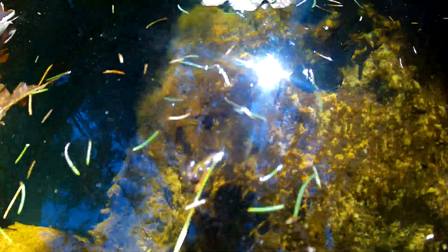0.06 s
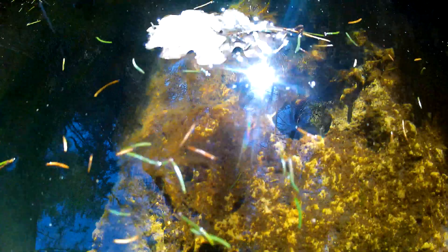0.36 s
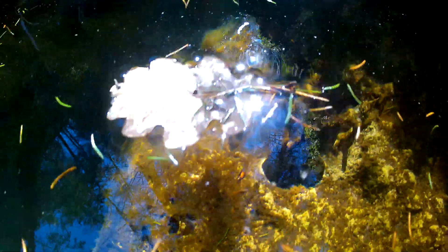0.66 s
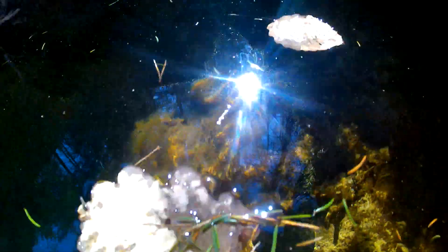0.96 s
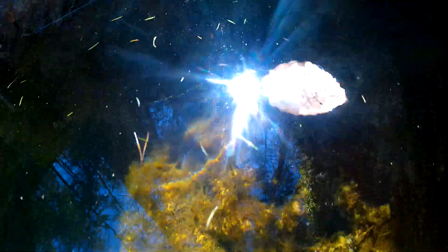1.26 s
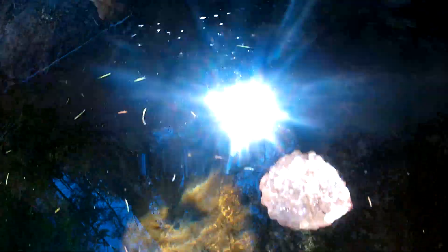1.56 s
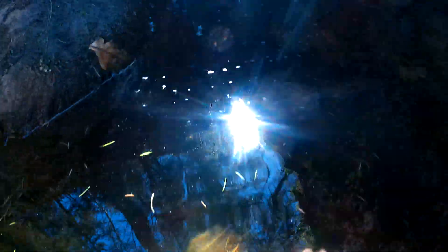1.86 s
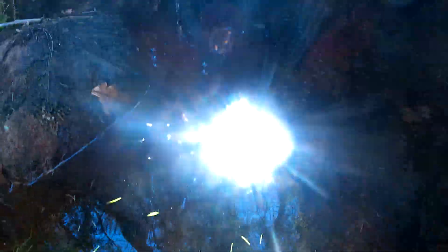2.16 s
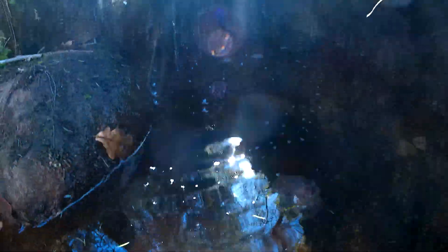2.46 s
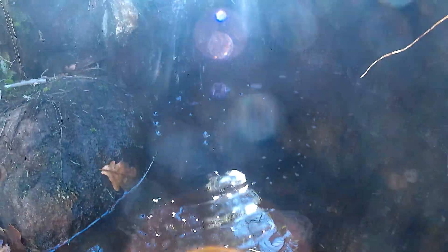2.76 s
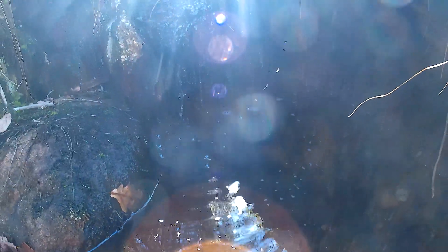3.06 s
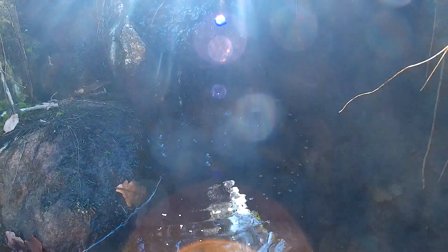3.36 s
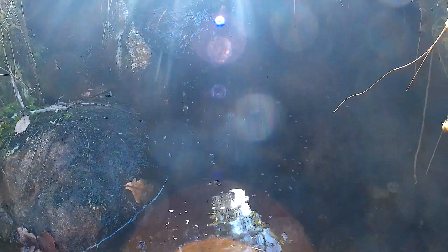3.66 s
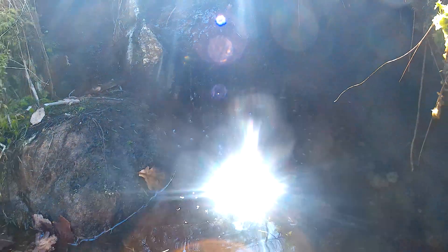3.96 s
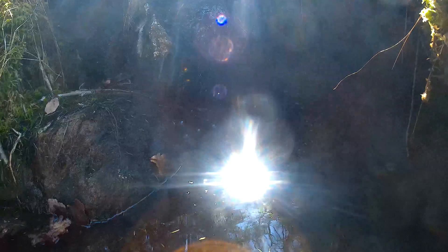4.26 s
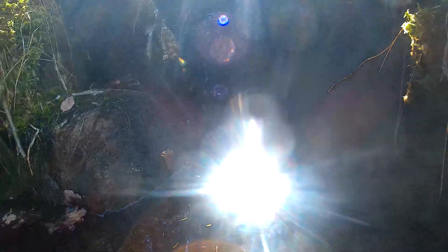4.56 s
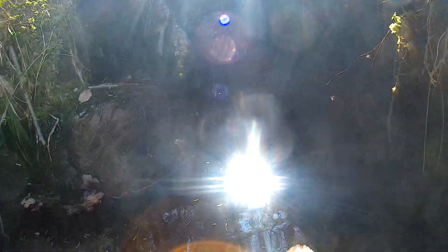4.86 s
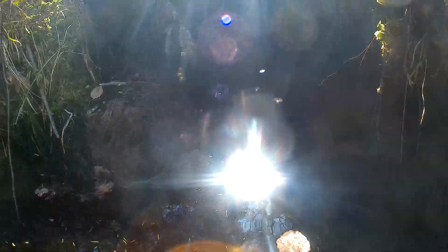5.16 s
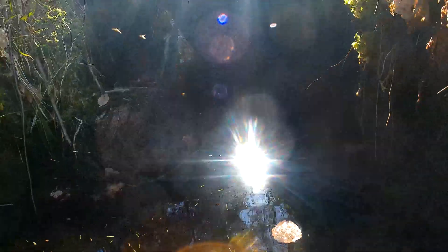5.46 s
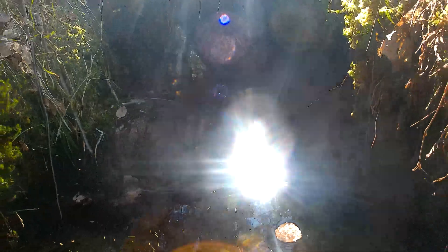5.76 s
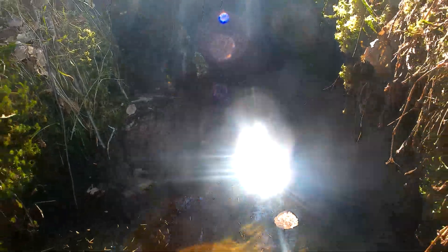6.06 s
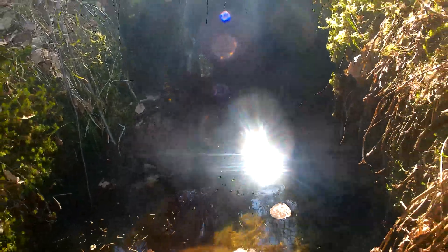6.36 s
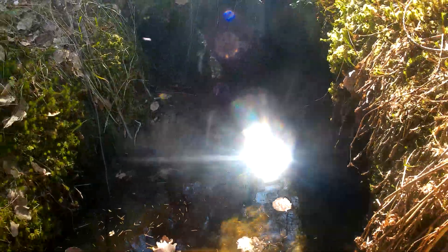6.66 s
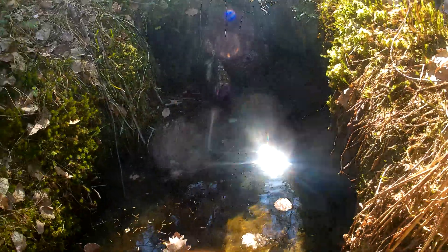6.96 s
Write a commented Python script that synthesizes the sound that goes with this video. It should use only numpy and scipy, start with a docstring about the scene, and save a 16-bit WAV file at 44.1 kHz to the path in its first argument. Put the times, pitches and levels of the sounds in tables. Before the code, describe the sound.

A small forest brook trickles over stones close to the microphone for about seven seconds, with almost no echo. From the start, many tiny bubbles babble together while larger ones gurgle and plop irregularly, several a second, often bending upward in pitch. Fine spray ticks lightly on top. The babble is liveliest in the first two and a half seconds, with more spray around 1 and 2.4 seconds. Clearer plops stand out at about 1.5 seconds and between 2.7 and 3.2 seconds. The flow softens near 3.5 seconds, picks up with a cluster of small drips around 4.6 seconds, then runs more gently from about 5.4 seconds to the end. Underneath throughout are a soft wash of distant water, a low rumble and a very faint high electronic whine. A barely audible, very high hiss flickers about once a second.

```python
"""In a forest, a small brook trickles over stones, close to a pocket camera.
Trapped air bubbles ring and rise in pitch as they near the surface; countless small ones babble
between them, spray ticks, and the stones and mossy banks throw it all back.
Under it lie the wash of water further off, a low rumble and the camera's faint whine.
A faint, very high hiss flickers on about once a second."""
import sys
import numpy as np
from scipy import signal
from scipy.fft import rfft, irfft
from scipy.io import wavfile
from scipy.ndimage import uniform_filter1d

SR = 44100
rng = np.random.default_rng(int(sys.argv[2]) if len(sys.argv) > 2 else 0)


def wav_out(sig):
    """Save sig, one row per channel (or a flat mono array), as 16-bit PCM at SR to the path in sys.argv[1]."""
    wavfile.write(sys.argv[1], SR, np.round(np.clip(np.atleast_2d(sig).T, -1, 1) * 32767).astype(np.int16))


N = 318402
TIME = np.arange(N) / SR


def undb(db):
    """Decibels to gain."""
    return 10 ** (np.asarray(db) / 20)


def level(x, db):
    """Set a sound to an rms level."""
    return x * undb(db) / np.sqrt(np.mean(x ** 2))


def automation(table, column):
    """Ramp through one column of a table whose rows start with a time in seconds."""
    rows = np.array(table)
    return np.interp(TIME, rows[:, 0], rows[:, column])


def equalise(x, points, size=8192):
    """Minimum-phase EQ through (Hz, dB) points, built by folding the cepstrum."""
    hz, db = np.transpose(points)
    bin_hz = np.arange(size // 2 + 1) * SR / size
    gain = undb(np.interp(np.log(bin_hz + 1), np.log(hz), db))
    cepstrum = irfft(np.log(gain))
    cepstrum[1:size // 2] *= 2
    cepstrum[size // 2 + 1:] = 0
    impulse = irfft(np.exp(rfft(cepstrum)))
    return signal.fftconvolve(x, impulse)[:N]


def drift(rate_hz):
    """A random modulator with an rms of 1: sample and hold, smoothed twice."""
    hold = max(int(SR / rate_hz), 1)
    steps = rng.standard_normal(N)[np.arange(N) // hold]
    return level(uniform_filter1d(uniform_filter1d(steps, hold), hold), 0)


def add(out, start_s, sound):
    """Mix a sound in at a time."""
    start = int(np.clip(start_s * SR, 0, len(out)))
    out[start:start + len(sound)] += sound[:len(out) - start]


def high_flicker(level_db=-66, period_s=1.025, first_s=.78, length_s=.075):
    """A faint, very high hiss flickers on about once a second."""
    band = signal.butter(4, [11800, 15000], "band", fs=SR, output="sos")
    hiss = signal.sosfilt(band, rng.standard_normal(N))
    gate = (TIME - first_s) % period_s < length_s
    return level(hiss, level_db) * gate


# The camera's whine. Each row: time in seconds, pitch in Hz, level of the fundamental in dB.
CAMERA_WHINE = [(0, 4645, -72.5), (2.6, 4680, -69), (3.05, 4812, -67), (7.2, 4650, -67.5)]

def camera(frame_hz=30, duty=.75, harmonic_db=-6.0, wander=0.015, buzz_db=-59):
    """The electronics whine for part of each frame and buzz at the frame rate."""
    frame, frame_phase = np.divmod(TIME * frame_hz, 1)
    pitch = automation(CAMERA_WHINE, 1) * (1 + wander * (drift(550) + drift(40) / 2))
    phase = 2 * np.pi * np.cumsum(pitch) / SR
    gate = uniform_filter1d(1. * (frame_phase < duty), size=100) * undb(2.15 * drift(20))
    whine = sum(level(gate * np.sin((k + 1) * phase), k * harmonic_db) for k in range(3))
    whine *= undb(automation(CAMERA_WHINE, 2))
    ticks = np.diff(frame, prepend=0)
    buzz = signal.sosfilt(signal.butter(2, [70, 220], "band", fs=SR, output="sos"), ticks)
    return whine + level(buzz, buzz_db)


# The tone of the distant stream and the air. Each row: frequency in Hz, relative gain in dB.
WASH_EQ = [(25, -2.5), (110, -6.5), (260, -11), (430, -11), (800, -19.5), (1500, -22), (2600, -30),
           (4600, -34), (7000, -35.5), (15500, -39)]

def wash(level_db=-51):
    """The bed: a smooth hiss of water further off, over a low rumble of air."""
    return level(equalise(rng.standard_normal(N), WASH_EQ), level_db)


def banks(x, tail_db=-16, t60_s=0.091, build_s=0.011, notch_hz=855, notch_q=12):
    """Mossy banks add a short diffuse tail; reflections among the stones cancel one narrow pitch."""
    t = np.arange(SR // 4) / SR
    impulse = rng.standard_normal(len(t)) * undb(-60 * t / t60_s) * (1 - np.exp(-t / build_s))
    impulse *= undb(tail_db) / np.linalg.norm(impulse)
    impulse[0] = 1  # the direct sound
    with_tail = signal.fftconvolve(x, impulse)[:N]
    return signal.lfilter(*signal.iirnotch(notch_hz, notch_q, fs=SR), with_tail)


# The resonant gaps between the stones. Each row: pitch in Hz, Q, gain of the added ring in dB.
STONE_GAPS = [(775, 46, 2.5), (1099, 47, -7.5)]

def stones(x):
    """The gaps between the stones ring on when a bubble passes through their pitch."""
    rings = (undb(db) * signal.lfilter(*signal.iirpeak(hz, q, fs=SR), x) for hz, q, db in STONE_GAPS)
    return x + sum(rings)


def droplet(hz, ring_db, slap_db, decay_s=0.0066, q=4.3):
    """A drop slaps the surface with a burst of hiss, which rings the tiny cavity that it makes."""
    t = np.arange(SR // 25) / SR
    slap = rng.standard_normal(len(t)) * np.exp(-t / decay_s) * -np.expm1(-t / decay_s * 5)
    cavity = signal.iirpeak(min(hz, SR / 3), q, fs=SR)
    ring = signal.lfilter(*cavity, signal.lfilter(*cavity, slap))
    return level(ring, ring_db) + level(slap, slap_db)


def bubble(hz, rise, life_s, quiver_depth=0.046, scoop_depth=0.47, scoop_cycles=1.08, attack_cycles=.62):
    """A pocket of air pinches off, rings, glides towards rise times its pitch and bursts."""
    t = np.arange(int(2 * life_s * SR) + 2) / SR
    age, cycles = t / life_s, t * hz
    freedom = np.clip(rise - 1, 0, 1)  # only a rising bubble scoops and swells at the surface
    # Its shape quivers, shaking the pitch about once every three cycles.
    quiver = quiver_depth * np.interp(0.339 * cycles, np.arange(64), rng.standard_normal(64))
    scoop = freedom * scoop_depth * np.exp(-cycles / scoop_cycles)  # starts flat at the pinch-off
    glide = 1 + (rise - 1) * np.tanh(.75 * age ** 2.505)  # lingers, then sweeps
    pitch = hz * glide * (1 + quiver - scoop)
    ring = np.sin(2 * np.pi * (np.cumsum(pitch) / SR + rng.random()))
    attack = -np.expm1(-cycles / attack_cycles)
    decay = np.exp(-2 * age ** 1.59)
    surface_swell = 0.6 * freedom * np.exp(-((age - 1) / 0.34) ** 2)
    burst_cutoff = np.exp(-(age / 1.23) ** 8)
    return ring * attack * (decay + surface_swell) * burst_cutoff


def fizz(low_hz=4200, high_hz=11000, life_s=0.0093, soft_db=-65, range_db=15, count=130):
    """The tiniest bubbles burst one by one, all along the brook."""
    out = np.zeros(N)
    for when, pitch, force in rng.random((count, 3)):
        ping = bubble(low_hz * (high_hz / low_hz) ** pitch, 1, life_s)
        add(out, when * N / SR, undb(soft_db + range_db * force ** 2) * ping)
    return out


# How lively the water is. Each row: time in seconds, babble level in dB, spray level in dB.
FLOW_LEVELS = [(0, -45.5, -64), (1, -43.5, -57), (1.7, -45.5, -68.5), (2.4, -45.5, -59.5), (3.5, -51, -66),
               (4.6, -46.5, -68.5), (5.4, -50.5, -67), (7.2, -51.5, -69.5)]
# The tone of falling drops. Each row: frequency in Hz, gain in dB.
SPRAY_EQ = [(900, -13), (2300, -1), (5200, 1.5), (7000, -8), (10500, -7.5), (15000, -22)]

def spray(centre_hz=3200, spread=0.375, slap_db=-3, scatter_db=3.0, flurry_db=2.5, count=560):
    """Fine drops fall back in flurries of soft, short pings."""
    out = np.zeros(N)
    for when, (pitch, force) in zip(rng.random(count), np.clip(rng.standard_normal((count, 2)), -2, 2)):
        ring_db = scatter_db * force
        add(out, when * N / SR, droplet(centre_hz * np.exp(spread * pitch), ring_db, ring_db + slap_db))
    flurries = undb(flurry_db * drift(rate_hz=18))
    return level(equalise(out, SPRAY_EQ) * flurries, 0) * undb(automation(FLOW_LEVELS, 2))


# The nearest drops, with levels before EQ.
# Each row: start in seconds, ring level in dB, ring pitch in Hz, slap level in dB.
CLOSE_DROPS = [(0.104, -61, 5900, -50.5), (0.7486, -49, 2420, -53), (0.8966, -48.5, 2170, -53),
               (0.935, -62, 7500, -52), (1.4332, -46, 2390, -45.5), (1.63, -54, 2360, -57),
               (2.066, -58.5, 2760, -49.5), (2.2098, -60, 2760, -52), (2.3027, -48, 2120, -65),
               (2.395, -60, 4730, -52), (2.5276, -44.5, 4100, -58), (2.55, -52.5, 6630, -48.5),
               (2.7505, -56, 2340, -51.5), (2.9615, -62, 4260, -52.5), (3.0917, -55, 5800, -50.5),
               (3.1742, -65, 4680, -51), (3.6682, -57.5, 4700, -49), (3.7547, -49.5, 2240, -59),
               (4.563, -46, 2300, -51.5), (4.609, -46.5, 2280, -66), (4.638, -54, 2800, -50),
               (4.7194, -55, 3550, -48), (4.7548, -53, 2960, -50), (4.933, -55.5, 2870, -60),
               (5.5242, -47.5, 1880, -56), (6.098, -50.5, 2200, -50)]

def splashes():
    """Larger drops hit the water close by, each with a slap and a ring."""
    out = np.zeros(N)
    for start_s, ring_db, hz, slap_db in CLOSE_DROPS:
        add(out, start_s, droplet(hz, ring_db, slap_db))
    return equalise(out, SPRAY_EQ)


# The tone of the hollow between the stones. Each row: frequency in Hz, relative gain in dB.
HOLLOW_EQ = [(350, 3.5), (750, 1), (1100, -1), (1420, 4.5), (1580, -5.5), (1750, -1), (2400, -6),
             (4000, -27), (10000, -26)]

def babble(centre_hz=1400, spread=0.2418, cycles=13, scatter_db=2.0, bend=0.059, lag_s=.007, spills=420):
    """Each spill traps three little bubbles that jostle, bend up or down, and ring in the hollow."""
    out = np.zeros(N)
    for when, cluster in zip(rng.random(spills), np.clip(rng.standard_normal((spills, 3, 5)), -2, 2)):
        for force, pitch, sustain, lag, lift in cluster:
            hz = centre_hz * np.exp(spread * pitch)
            rise = np.exp(bend * (lift + .5))
            life_s = cycles * np.exp(.5 * sustain) / hz
            add(out, when * N / SR + lag_s * lag, undb(scatter_db * force) * bubble(hz, rise, life_s))
    jostle = undb(1.5 * drift(400))
    return level(equalise(out * jostle, HOLLOW_EQ), 0) * undb(automation(FLOW_LEVELS, 1))


# The big, clear bubbles up front. Each row: start in seconds, pitch before the climb in Hz,
# life in seconds, climb (0 held under a stone, 1 rising freely, more if swept up), gain in dB.
BIG_BUBBLES = [(0.15, 1035, 0.016, 0.48, -24.5), (0.355, 788, 0.05, 0.38, -34.5),
               (0.423, 694, 0.029, 0.2, -25.5), (0.448, 642, 0.045, 0.19, -35),
               (0.605, 1100, 0.01, 1.42, -28.5), (0.68, 627, 0.019, 0.73, -22.5),
               (0.775, 1102, 0.011, 1.1, -24), (0.881, 1030, 0.0061, 1, -28),
               (0.936, 1384, 0.026, 0.25, -26), (1.209, 1190, 0.015, 0.52, -33.5),
               (1.212, 756, 0.026, 0.25, -35.5), (1.29, 1260, 0.045, 0.43, -33.5),
               (1.413, 1172, 0.021, 0.97, -28), (1.503, 1256, 0.018, 0.54, -23),
               (1.522, 1110, 0.007, 0.3, -14.5), (1.68, 527, 0.047, 0.25, -27.5),
               (1.724, 533, 0.055, 0.65, -31.5), (1.924, 587, 0.033, 0.72, -30.5),
               (1.963, 1267, 0.022, 0.024, -32), (2.01, 1210, 0.0078, 0.74, -27.5),
               (2.068, 1307, 0.021, 0.088, -30.5), (2.189, 1020, 0.042, 0.88, -33.5),
               (2.233, 843, 0.023, 1.46, -23), (2.288, 1020, 0.009, 0.14, -27),
               (2.503, 1376, 0.014, 0.67, -24), (2.53, 1160, 0.011, 1.64, -26),
               (2.55, 768, 0.098, 0.05, -42.5), (2.603, 1310, 0.016, 1.24, -29),
               (2.747, 1480, 0.0094, 0, -20), (2.786, 612, 0.027, 0.66, -21.5),
               (2.935, 1366, 0.016, 0.65, -28.5), (2.962, 1444, 0.021, 0.36, -28),
               (3.005, 1162, 0.014, 0.25, -17.5), (3.047, 1660, 0.0092, 0.33, -26),
               (3.114, 780, 0.03, 0, -38.5), (3.177, 1120, 0.013, 0.79, -20.5),
               (3.213, 1280, 0.012, 1.27, -27.5), (3.351, 1170, 0.031, 0.38, -31.5),
               (3.388, 980, 0.011, 0, -32), (3.52, 1415, 0.013, 0.91, -26), (3.686, 710, 0.045, 0.39, -27),
               (3.742, 1144, 0.017, 0.86, -28.5), (3.806, 749, 0.06, 0.82, -33),
               (3.912, 1160, 0.03, 0.74, -36), (4.09, 1026, 0.015, 0.12, -23),
               (4.138, 599, 0.046, 0.22, -31), (4.212, 1004, 0.022, 0.79, -27),
               (4.386, 1020, 0.021, 0.87, -25.5), (4.563, 946, 0.041, 0.072, -25.5),
               (4.66, 827, 0.053, 1.15, -28), (4.868, 970, 0.017, 0.14, -26.5),
               (5.194, 1237, 0.028, 0.37, -30.5), (5.443, 645, 0.026, 0.26, -36),
               (5.679, 669, 0.04, 0.15, -31), (5.819, 1410, 0.0086, 0.46, -29),
               (6.204, 774, 0.032, 0.082, -36), (6.377, 725, 0.06, 0.4, -35.5),
               (6.464, 955, 0.036, 0.0, -25.5), (6.636, 960, 0.014, 0.7, -31),
               (6.681, 857, 0.031, 1.34, -36.5), (6.718, 1017, 0.02, 0.93, -33.5),
               (6.738, 1127, 0.015, 0.45, -27.5), (6.782, 1025, 0.041, 0, -35),
               (6.971, 656, 0.062, 0.4, -36)]

def gurgles(octave_hz=782, shard_db=-11.5, shard_hz=1450, shard_life_s=0.0038, froth_db=-20.5):
    """Big bubbles wobble as they ring and tear a little froth; at the surface each breaks into three."""
    big, shards = np.zeros(N), np.zeros(N)
    for start_s, hz, life_s, climb, db in BIG_BUBBLES:
        # A free bubble at octave_hz heads an octave up; bigger, lower ones climb further.
        rise = 1 + climb * (octave_hz / hz) ** 1.48
        add(big, start_s, undb(db) * bubble(hz, rise, life_s))
        for when, pitch, sustain in rng.random((3, 3)):
            shard = bubble(shard_hz * 2 ** (pitch - .5), 1.05, shard_life_s * (.5 + sustain))
            add(shards, start_s + life_s * (.5 + when), undb(db + shard_db) * shard)
    envelope = np.abs(signal.hilbert(big))
    froth = level(equalise(rng.standard_normal(N), HOLLOW_EQ), froth_db) * envelope
    wobble = undb(1.7 * drift(300))
    return big * wobble + shards + froth


def lulls(duck_db=-5, closing_s=0.016):
    """A gain that ducks the babble while the water closes over the next big pocket of air."""
    closing = np.zeros(N)
    for start_s, *_ in BIG_BUBBLES:
        add(closing, start_s - 1.7 * closing_s, np.hanning(int(closing_s * SR)))
    return undb(duck_db * np.minimum(closing, 1))


def scene():
    """The mono mix: the brook among its stones and banks, over the quiet background."""
    water = gurgles() + babble() * lulls() + spray() + fizz() + splashes()
    return (banks(stones(water)) + wash() + camera() + high_flicker())[None]


def record(dry, top_hz=15900, dc_offset=-.0485):
    """A steep low-pass cuts the very top, and the signal rests slightly off zero."""
    lowpass = signal.ellip(10, .1, 70, top_hz, fs=SR, output="sos")
    return signal.sosfilt(lowpass, dry) + dc_offset


dry = scene()
out = record(dry)
wav_out(out)
```